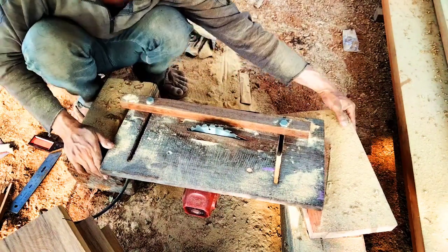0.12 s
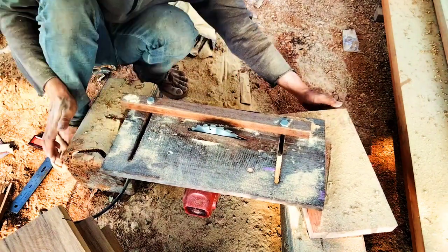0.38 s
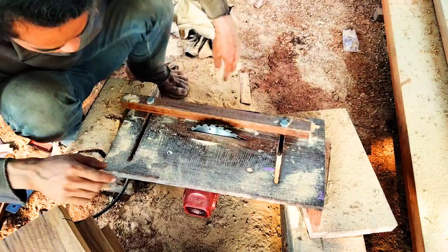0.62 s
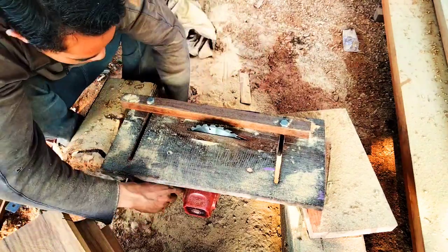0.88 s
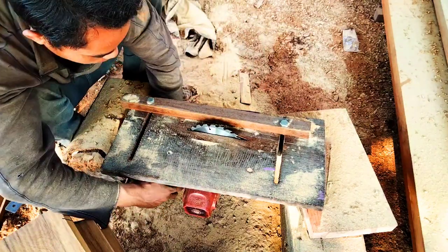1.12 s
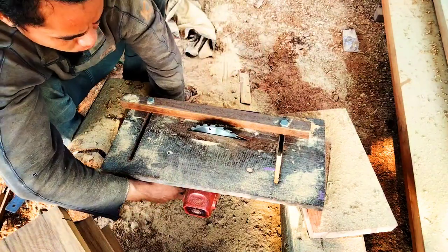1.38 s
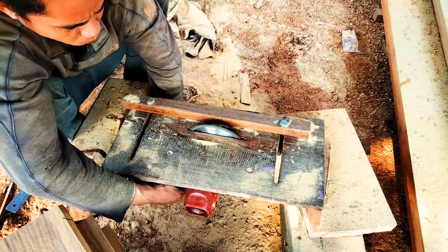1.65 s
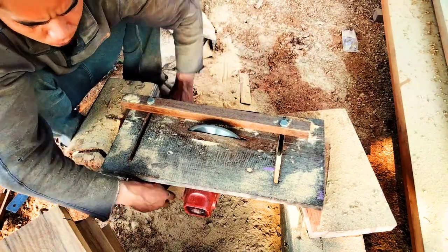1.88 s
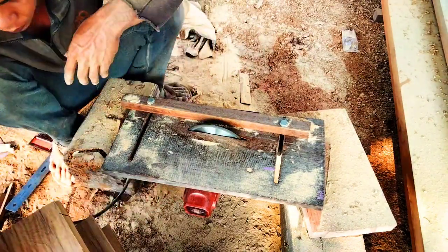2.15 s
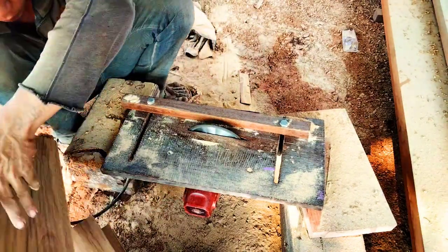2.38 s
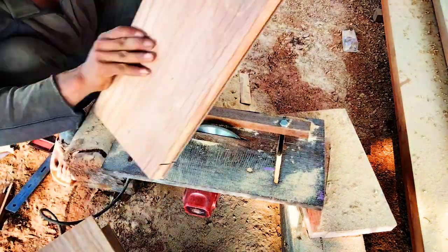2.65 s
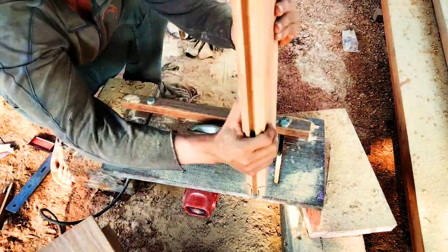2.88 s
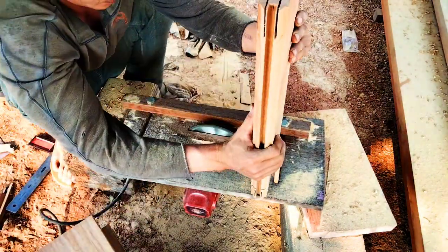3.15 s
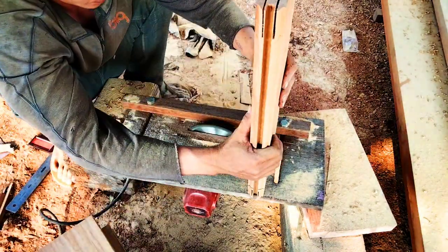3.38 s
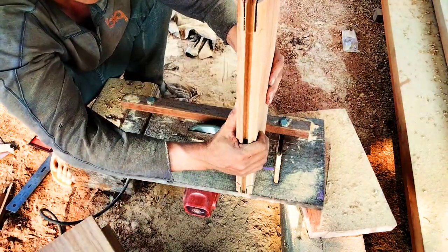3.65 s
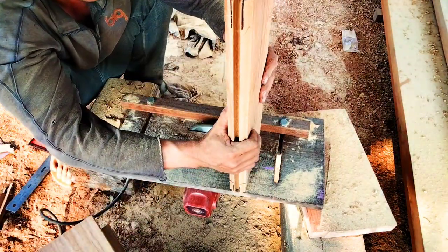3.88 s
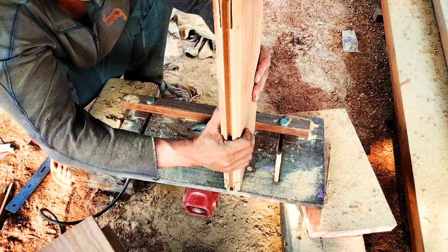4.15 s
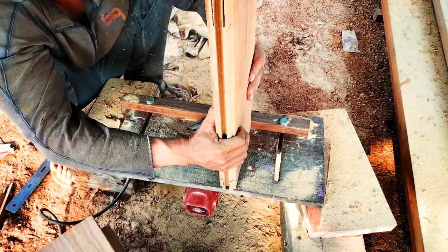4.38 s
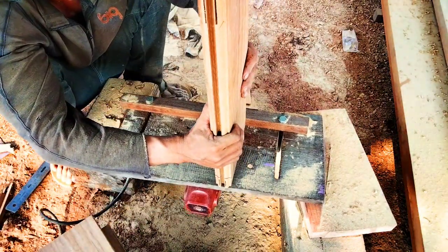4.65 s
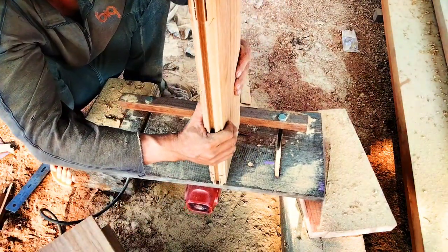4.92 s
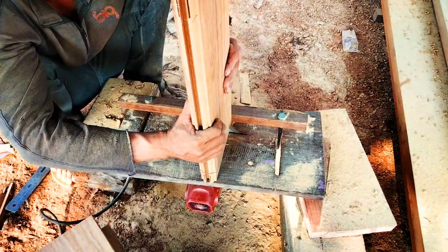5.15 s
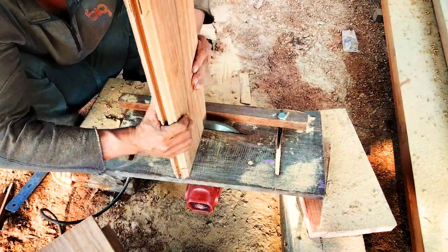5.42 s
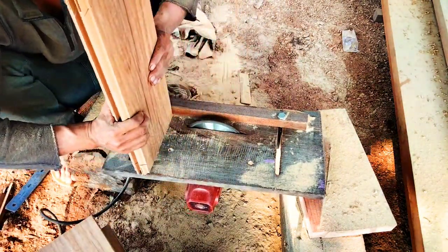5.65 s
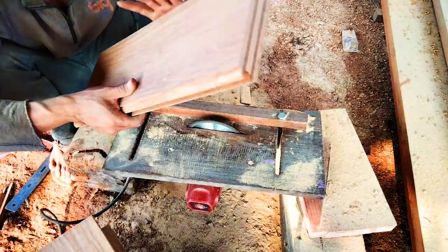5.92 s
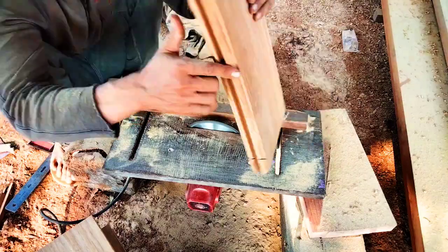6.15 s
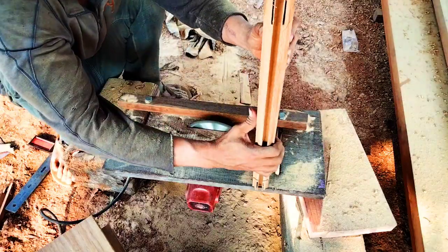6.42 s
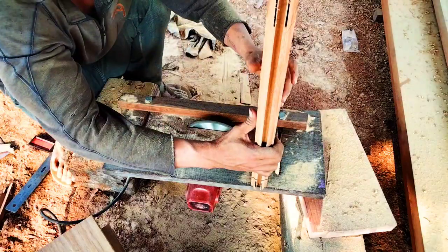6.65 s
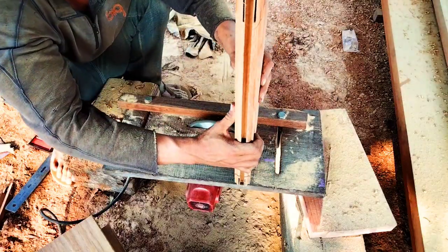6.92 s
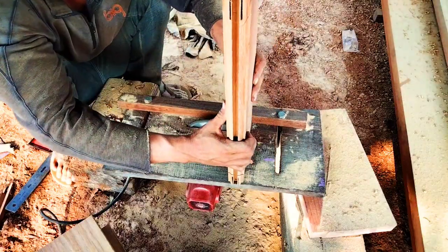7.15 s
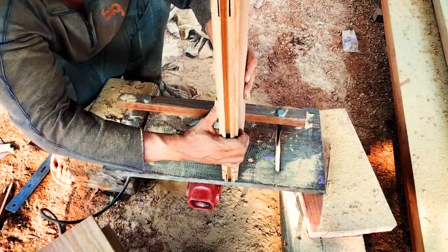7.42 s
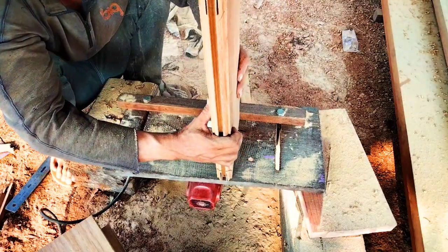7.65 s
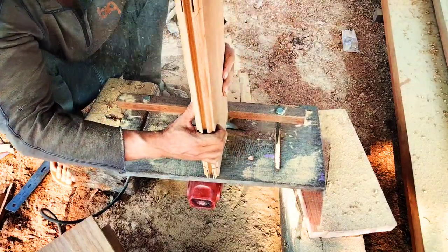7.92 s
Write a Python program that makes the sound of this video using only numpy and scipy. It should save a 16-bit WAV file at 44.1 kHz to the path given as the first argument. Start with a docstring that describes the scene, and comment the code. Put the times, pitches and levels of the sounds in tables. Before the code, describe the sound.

For the first 1.6 seconds a yard is very quiet: low lumpy rumble, faint plank-like ticks, small rustles, a tiny squeak and very high falling chirps. At 1.6 a switch jerks slack gears into a short hard rattle, and a small motor whines upward within about half a second, settling near 1.8 kHz over a bright, throbbing fan rush. It runs free until about 4.1, when a board meets the blade: ringing tooth strikes, loud tearing hiss and clicking chips, the whine sagging markedly. Dust gusts thump and crackle on the close microphone near 4.3, 4.5 and 4.9. The cut ends around 5.4 to 5.65 with sharp snags, heavy thumps and a brief extra touch. The whine recovers and runs free until 7.1, then a second cut tears in, pitch sagging again, a thump at 7.7, still cutting at the end around 8 seconds. Close, dry mono.

```python
"""A quiet yard first: low rumble, ticks ringing like planks, noise rustles, falling chirps. Then a small
geared saw under a plank table, heard from close above in mono: the switch jerks slack gears into a burst of
noise, and the motor whines up to speed as sines locked to its rotation, with a throbbing fan rush. A board is
fed over the blade twice, with a brief touch between: teeth strike resonances, fibres hiss, the speed sags,
and gusts of sawdust thump the microphone as pressure pulses with noise cracks."""
import sys
import numpy as np
from scipy import signal
from scipy.fft import rfft, irfft, next_fast_len
from scipy.io import wavfile
from scipy.ndimage import uniform_filter1d, map_coordinates

SR = 44100
rng = np.random.default_rng(int(sys.argv[2]) if len(sys.argv) > 2 else 0)


def log_audio(samples):
    """Write samples as a 16-bit WAV file to the path given in sys.argv[1]."""
    # one column per channel
    frames = np.atleast_2d(samples).T
    # limit to full scale, then quantise
    limited = np.clip(frames, -1, 1)
    pcm = np.round(limited * 32767).astype(np.int16)
    wavfile.write(sys.argv[1], SR, pcm)


def gain_from_db(level_db):
    """Convert decibel levels to linear amplitude factors (20 dB per decade)."""
    decades = np.asarray(level_db, float) / 20
    return 10 ** decades


N = 354563
T = np.arange(N) / SR
GEAR, TEETH = 7 / 38, 24  # blade turns per armature turn; teeth on the blade


def unit(x):
    """Scale to rms 1."""
    return x / np.sqrt(np.mean(x ** 2) + 1e-20)


def curves(rows, outside=None):
    """One value per sample for each column after the time."""
    s, *cols = np.transpose(rows)
    return [np.interp(T, s, c, outside, outside) for c in cols]


def wobble(rate_hz):
    """Smooth random curve, rate_hz knots a second."""
    return map_coordinates(rng.standard_normal(int(N * rate_hz / SR) + 4), [T * rate_hz])


def bump(centre_s, half_s):
    """Gaussian swell, down to 1/e at half_s from its centre."""
    return np.exp(-((T - centre_s) / half_s) ** 2)


def smoothed(x, rows, columns):
    """Running mean over both axes."""
    return uniform_filter1d(uniform_filter1d(x, rows, 0), columns, 1)


def filtered(x, response):
    """x times a complex response of frequency."""
    m = next_fast_len(N + 8192)
    return irfft(rfft(x, m) * response(np.fft.rfftfreq(m, 1 / SR)), m)[:N]


def ringing(x, modes, flip=-1):
    """x through a set of resonances; flip=1 keeps neighbours in step, which digs notches between them."""
    def response(f):
        total = 0
        for k, (hz, width, db) in enumerate(modes):
            total = total + flip ** k * gain_from_db(db) * 1j * f * width / (hz * hz - f * f + 1j * f * width)
        return total
    return filtered(x, response)


def noise(spectrum, patchy_db):
    """Coloured noise of rms 1 with time-frequency patches of random gain."""
    z = signal.stft(rng.standard_normal(N), nperseg=1024)[2]
    field = smoothed(rng.standard_normal(z.shape), 3, 7)
    x = signal.istft(z * gain_from_db(patchy_db * unit(field)), nperseg=1024)[1][:N]
    hz, db = np.transpose(spectrum)
    return unit(filtered(x, lambda f: gain_from_db(np.interp(np.log(f + 1), np.log(hz), db))))


# ticks: (time [s], level [dB], t60 [s], extra level of the lowest mode [dB])
TICKS = [(.072, -61, .04, -4), (0.084, -57, 0.037, -8), (0.129, -48, 0.014, 4), (0.368, -64, 0.02, -5),
         (0.533, -66, 0.03, 7), (1.275, -67, .03, -9), (1.546, -52.5, 0.025, -20)]
# plank modes: (frequency [Hz], level [dB])
PLANK = [(800, 2), (1430, 1), (2050, -8), (2450, -8)]


def ticks():
    """Decaying plank modes under a shorter noise burst."""
    out, t = np.zeros(N + SR), np.arange(SR // 10) / SR
    for s, db, t60, lowest_db in TICKS:
        knock = 0.89 * gain_from_db(-60 * t / 0.025) * rng.standard_normal(len(t))
        for hz, level in PLANK:
            mode_db = level + lowest_db * (hz < 1000) + rng.normal(0, 2)
            knock += gain_from_db(mode_db) * np.sin(2 * np.pi * hz * t)
        out[round(s * SR):][:len(t)] += gain_from_db(db - 60 * t / t60) * knock
    return out[:N]


# rustles: (time [s], level [dB], length [s])
RUSTLES = [(0.077, -70, 0.055), (0.13, -71, 0.045), (.37, -76, 0.027), (.46, -66.5, 0.037),
           (0.777, -68, .03)]


def rustles():
    """Short swells of white noise."""
    swell = sum(gain_from_db(db) * bump(s, length / 2) for s, db, length in RUSTLES)
    return swell * rng.standard_normal(N)


# squeaks: (time [s], level [dB], frequency [Hz], half length [s])
SQUEAKS = [(.4, -74, 2700, .012), (1.01, -72, 2770, .028)]
# far chirps: (time [s], peak [dB], starting frequency [Hz])
CHIRPS = [(1.005, -72, 12400), (1.32, -69, 12600)]


def chirps():
    """Steady squeaks with unsteady level, and chirps of falling pitch with phase jitter."""
    fall_hz_per_s = 66000
    out, t = np.zeros(N + SR), np.arange(SR // 10) / SR
    for s, db, hz, half_s in SQUEAKS:
        out[:N] += gain_from_db(db + 3.3 * wobble(59.2)) * bump(s, half_s) * np.sin(2 * np.pi * hz * T)
    for s, db, hz in CHIRPS:
        jitter = 0.046 * np.cumsum(rng.standard_normal(len(t)))
        cycles = hz * t - fall_hz_per_s * t ** 2 / 2 + jitter
        envelope = np.exp(-((t - .012) / 0.009) ** 2)
        out[round(s * SR):][:len(t)] += gain_from_db(db) * envelope * np.sin(2 * np.pi * cycles)
    return out[:N]


# yard rumble: (frequency [Hz], density [dB per Hz])
YARD = [(12, -32), (25, -29), (109, -8), (259, -8), (289, -8), (371, -9), (666, -21.5), (2460, -32),
        (2830, -30.5), (4800, -39), (11700, -44), (15400, -46)]


def yard():
    """Low lumpy noise rumble, with small ticks, rustles and chirps."""
    rumble_db = -63
    rumble = gain_from_db(rumble_db + 1.6 * wobble(20.4)) * noise(YARD, patchy_db=-1.5)
    return rumble + ticks() + rustles() + chirps()


SWITCH_S, CATCH_S = 1.607, 1.66  # switch closes; gears have taken up their slack
FREE_HZ = 1826  # armature turns a second without load
# armature load: (time [s], pull on the steady speed [Hz])
DRAG = [(1.66, 17), (3, 1), (4.13, 0), (4.3, 153), (4.55, 315), (4.95, 434), (5.1, 427), (5.28, 376),
        (5.42, 153), (5.56, 25), (6.2, 6), (7.09, 10), (7.25, 124), (7.47, 407), (7.6, 420), (7.8, 456),
        (8.04, 455)]


def armature():
    """Turns per second: the rotor climbs to its free speed and follows the load, both with one lag."""
    below_free_hz, lag_s = 663, .16  # shortfall at the catch; inertia
    step = 1 / (lag_s * SR)
    drag = curves(DRAG)[0]
    sag = signal.lfilter([step], [1, step - 1], drag - drag[0]) + drag[0]
    return FREE_HZ - sag - below_free_hz * np.exp(-np.maximum(T - CATCH_S, 0) / lag_s)


def turns():
    """Armature revolutions so far, with a slight hunting of the speed."""
    return np.cumsum(armature() * (1 + 0.0004 * wobble(25))) / SR


def turning(rev, multiple):
    """Sine at a multiple of the armature rotation."""
    return np.sin(2 * np.pi * multiple * rev)


# casing modes: (frequency [Hz], width [Hz], level [dB])
CASING = [(773, 67, -1), (1160, 32, 10), (2010, 280, -4), (3700, 210, -8), (5160, 380, -5.5)]


def jerk():
    """Slack gears rattle the casing: sharp attack, hold until the catch, fast then slow release."""
    level_db, attack_s, t60_s, tail_db, tail_t60_s = -24.5, 0.0042, 0.0068, -19, .25
    after = np.maximum(T - CATCH_S, 0)
    attack = np.clip((T - SWITCH_S) / attack_s, 0, 1)
    release = np.maximum(gain_from_db(-60 * after / t60_s), gain_from_db(tail_db - 60 * after / tail_t60_s))
    rattle = rng.standard_normal(N) * (rng.random(N) < .15)
    return gain_from_db(level_db) * attack * release * (unit(ringing(rattle, CASING)) + 0.38 * unit(rattle))


# fan, brush and gear rush: (frequency [Hz], density [dB per Hz])
AIR = [(15, -62), (25, -27), (321, -23), (388, -26), (1450, -10.5), (1610, -11), (1800, -10.5), (1950, -10),
       (2110, -7.5), (2350, -12.5), (3420, -15.5), (3920, -8), (7470, -12.5), (8310, -10.5), (15400, -11.5)]


def rush(rev, speed):
    """Fan, brush and gear noise, throbbing once a blade turn and growing with the run-up."""
    level_db, speed_power, start_db = -25.98, 0.61, -4.5
    attack_s, settle_s = 0.0058, 1.3
    on = np.maximum(T - SWITCH_S, 0)
    spun_up = np.where(T < PASSES[0][0][0], speed / FREE_HZ, 1)  # run-up only, not the sag
    rush_db = level_db + speed_power * 10 * np.log10(spun_up) + start_db * np.exp(-on / settle_s)
    rush_db += 20 * np.log10(np.clip(on / attack_s, 1e-6, 1))
    throb = 1 + .15 * turning(rev, GEAR)
    return gain_from_db(rush_db + 0.78 * wobble(8)) * throb * noise(AIR, patchy_db=1.5)


# housing response to the whine, dead near one speed: (frequency [Hz], gain [dB])
HOUSING = [(1170, -13), (1250, 0), (1350, -2.5), (1420, 1.5), (1495, -2.5), (1540, -6), (1580, -16),
           (1622, -13), (1648, -1), (1685, -2), (1760, -5.5), (1825, -4)]
# free-running tones: (multiple of armature, multiple of blade shaft, rms level at full speed [dB])
ORDERS_FREE = [(0, 1, -65), (0, 1.29, -66), (0, 2, -64), (1, -1, -55), (1, 1, -50), (2, 0, -52),
               (3, 0, -53), (0, 24, -45.5)]
# overtones passing a housing resonance: (multiple of armature, centre [Hz], half width [Hz], rms level [dB])
PASSING = [(1 + GEAR, 1820, 110, -44), (2, 2500, 70, -38), (5, 7900, 550, -42)]


def whine(rev, speed):
    """The unbalanced armature whines through the housing; gears, shaft and teeth add weaker tones."""
    whine_db = -29 + np.interp(speed, *np.transpose(HOUSING))
    tones = gain_from_db(whine_db + 1.1 * wobble(14)) * turning(rev, 1)
    swing = (speed / speed.max()) ** 14  # higher tones fade quickly when the speed drops
    for rotor, shaft, db in ORDERS_FREE:
        fade = swing if rotor or shaft > 2 else 1
        unsteady_db = 4 if shaft < TEETH else 1
        tones = tones + fade * gain_from_db(db + unsteady_db * wobble(15)) * turning(rev, rotor + shaft * GEAR)
    for multiple, hz, width, db in PASSING:
        resonance = np.exp(-((multiple * speed - hz) / width) ** 2)
        tones = tones + gain_from_db(db) * resonance * turning(rev, multiple)
    return np.sqrt(2) * tones


# moving air and sawdust at the microphone: (frequency [Hz], density [dB per Hz])
DUST = [(12, -24), (20, -10), (144, -11.5), (264, -10.5), (341, -14), (900, -14.5), (1170, -15.5),
        (1980, -120)]


def draught(speed):
    """Fan air reaches the microphone as low patchy noise, steeply dependent on speed."""
    low = noise(DUST[:4] + [(400, -37)], patchy_db=9.5)
    return np.sqrt(2) * (speed / speed.max()) ** 8 * gain_from_db(-60.0 + 3.3 * wobble(13)) * low


def motor(rev):
    """Jerk and rush from the switch on; whine and draught once the gears catch."""
    speed = armature()
    return (T > CATCH_S) * (whine(rev, speed) + draught(speed)) + rush(rev, speed) + jerk()


# dust gusts: (time [s], push [dB], length [s], flutter share, crack [dB])
GUSTS = [(2.815, -46, 0.015, 0.8, -62), (4.267, -20, 0.0062, 0.084, -12.5),
         (4.329, -19.5, 0.011, 0.43, -16), (4.538, -38, 0.009, 0.21, -21), (4.839, -43, 0.014, 0.74, -24),
         (4.911, -32, 0.0085, 0.43, -26), (5.389, -32, 0.0022, 0.58, -14), (5.552, -12, 0.0032, 1.2, -14.5),
         (5.57, -20, 0.0082, 0.72, -7.5), (5.648, -18.5, 0.0038, 2.8, -7.5),
         (7.187, -41, 0.0056, 0.42, -19.5), (7.24, -35, 0.0084, 0.65, -37),
         (7.706, -17.5, 0.0048, 0.56, -20.5)]


def gusts():
    """A puff pushes the diaphragm, which swings back slowly; grit cracks on the grille."""
    out, t = np.zeros(N + SR), np.arange(SR // 4) / SR
    for s, db, length, rough, crack_db in GUSTS:
        u = t / length
        push = 3.13 * u * np.exp(-u) - 0.1 * u * np.exp(-u / 6.5)
        slow = uniform_filter1d(uniform_filter1d(rng.standard_normal(len(t)), 30), 30)
        flutter = 1 + rough * unit(slow) * np.exp(-u / 4)
        crack = gain_from_db(crack_db - 60 * t / 0.093) * uniform_filter1d(rng.standard_normal(len(t)), 5)
        out[round(s * SR):][:len(t)] += gain_from_db(db) * push * flutter + crack
    return out[:N]


# blade modes: (frequency [Hz], width [Hz], level [dB])
BLADE = [(5115, 130, 5.5), (5670, 43, 2), (5940, 42, -3), (7130, 86, -2.5), (7850, 42, -12),
         (8600, 96, -2.5), (9255, 49, 0.5), (9430, 39, 0), (9760, 91, -3), (10570, 410, -6),
         (11600, 130, -12), (12330, 80, -6), (12350, 190, -5.5), (14100, 140, -5)]
# modes of the board under the teeth: (frequency [Hz], width [Hz], level [dB])
BOARD = [(2500, 1200, -20), (6700, 1700, -10), (6802, 490, 3), (8240, 570, -6.5), (10830, 570, 8),
         (12600, 620, -1), (14550, 290, 0)]


def tooth_strikes(rev):
    """Each tooth strikes once, at its sub-sample moment, ringing board and blade; rms 1."""
    tooth_spread_db, soft_hz = 2.5, 15500  # bite differs per tooth; wood cushions the blow above soft_hz
    passed = rev * GEAR * TEETH
    tooth = np.arange(1, int(passed[-1]))
    at = np.interp(tooth, passed, np.arange(N))
    angle = 2 * np.pi * tooth / TEETH
    runout = 1 + 1.0 * np.cos(angle) + 0.37 * np.cos(2 * angle + 3.2)  # blade sits off centre
    own = gain_from_db(tooth_spread_db * rng.standard_normal(TEETH))[tooth % TEETH]
    bevel = 1 + .09 * (-1.) ** tooth  # alternates left and right
    size = own * runout * bevel * gain_from_db(1.6 * rng.standard_normal(len(tooth)))
    taps = np.floor(at)[:, None] + np.arange(-7, 9)
    lag = taps - at[:, None]
    kernel = np.sinc(lag) * np.cos(np.pi * lag / 16) ** 2
    where = np.clip(taps, 0, N - 1).astype(int)
    blows = np.bincount(where.ravel(), (kernel * size[:, None]).ravel(), N)
    blows = filtered(blows, lambda hz: 1 / (1 + (hz / soft_hz) ** 8))
    return unit(ringing(blows, BOARD, flip=1.0) + 0.34 * ringing(blows, BLADE))


# torn fibres: (frequency [Hz], density [dB per Hz])
WOOD = [(300, -46), (500, -18), (1100, -3.5), (2300, -5), (3140, -7.5), (3900, -7.5), (4800, -16),
        (6000, -7), (6900, -0.5), (7600, -4.5), (9000, -6), (10200, -3), (12800, 0), (15400, -7)]
# table-top modes under the cut: (frequency [Hz], width [Hz], level [dB])
TABLE = [(1120, 21, -4.5), (2420, 28, 7), (2690, 20, 2)]


def fibre_hiss(rev):
    """Torn fibres hiss through blade and table modes, swelling once a blade turn; rms 1."""
    sweep = 1 + .5 * np.cos(2 * np.pi * GEAR * rev)
    fibres = sweep * noise(WOOD, patchy_db=3.5)
    blade, table = unit(ringing(fibres, BLADE)), unit(ringing(fibres, TABLE))
    return unit(0.84 * fibres + 1.1 * blade + 0.18 * table)


# tones under load: (multiple of armature, multiple of blade shaft, amplitude re tearing [dB])
SIDEBANDS = [(1, 1, -27), (1, 3, -24), (1, 5, -26), (0, 7, -27), (0, 9, -23)]


def gear_mesh(rev):
    """The loaded pinion sings, 7 teeth a turn, among tones of armature and shaft."""
    mesh = gain_from_db(-23 + 4.3 * wobble(31)) * turning(rev, 7)
    for rotor, shaft, db in SIDEBANDS:
        mesh = mesh + gain_from_db(db + 3.7 * wobble(9)) * turning(rev, rotor + shaft * GEAR)
    return mesh


def chips():
    """Chips snap off at random and click: band-limited impulses of random size."""
    chips_per_s, drive_db = 120, 8
    thrown = (rng.random(N) < chips_per_s / SR) * rng.exponential(size=N)
    return -gain_from_db(drive_db) * filtered(thrown, lambda hz: 1j * hz / (500 + 1j * hz) / (1 + 1j * hz / 4000) ** 2)


# thicker sprays of dust: (time [s], level [dB])
SPRAYS = [(4.171, -50), (4.32, -47), (4.88, -41), (5.17, -43), (5.36, -38), (5.56, -37), (5.635, -29.5),
          (7.21, -48), (7.43, -47), (7.72, -47), (7.96, -39)]


def sawdust(tear):
    """Dust rumbles on the microphone, steadily under the tearing and thicker in sprays."""
    under_db, spray_half_s = -25, 0.033
    level = gain_from_db(under_db) * tear + sum(gain_from_db(db) * bump(s, spray_half_s) for s, db in SPRAYS)
    return level * gain_from_db(2.5 * wobble(35)) * noise(DUST, patchy_db=2.0)


# board on blade, one list a contact: (time [s], tearing [dB before trim], tooth strikes [dB before trim])
PASSES = [
    [(4.13, -53, -34), (4.2, -26.5, -15), (4.3, -18, -14.5), (4.39, -17.5, -18), (4.47, -17.5, -24.5),
     (4.54, -17.5, -19.5), (4.6, -15.5, -20.5), (4.72, -19, -18.5), (4.76, -16.5, -28), (4.82, -17.5, -20),
     (4.98, -20, -21), (5.08, -19.5, -22.5), (5.2, -15.5, -21), (5.39, -18, -35), (5.41, -27, -27.5),
     (5.47, -21, -28), (5.545, -27, -31), (5.562, -47, -60)],
    [(5.6, -35, -45), (5.61, -19.5, -32), (5.645, -16.5, -34), (5.662, -44, -42)],
    [(7.09, -49, -48), (7.118, -27, -17), (7.15, -26, -12), (7.2, -21, -18), (7.26, -22, -11.5),
     (7.37, -19, -20.5), (7.44, -15.5, -16.5), (7.52, -21, -18), (7.6, -17, -23.5), (7.69, -17, -20),
     (7.85, -17.5, -22.5), (7.93, -14, -29), (8.04, -15.5, -35)],
]
# a tooth rips the edge: (time [s], peak [dB before trim], rise [s])
SNAGS = [(5.399, -16, 0.026), (5.549, -17, 0.0077), (5.649, -10, 0.0062)]


def cut(rev):
    """Board contact drives tooth strikes and tearing; snags flare up, dust follows the tearing."""
    trim_db, snag_fall_s = -4.0, 0.0025
    contacts = zip(*[curves(p, -120) for p in PASSES])
    tear, strike = [gain_from_db(np.max(c, 0)) for c in contacts]
    dust = sawdust(tear)
    for s, db, rise in SNAGS:
        tear = tear + gain_from_db(db) * np.exp(-np.where(T < s, (s - T) / rise, (T - s) / snag_fall_s))
    torn = tear * (fibre_hiss(rev) + gear_mesh(rev) + chips())
    struck = strike * gain_from_db(1.5 * wobble(45) + 1.9 * wobble(14)) * tooth_strikes(rev)
    grain = gain_from_db(0.97 * wobble(30))
    return gain_from_db(trim_db) * grain * (torn + struck) + dust


def scene():
    """The same sound on both channels."""
    rev = turns()
    return np.tile(yard() + motor(rev) + gusts() + cut(rev), (2, 1))


# depth below the neighbours at which a narrow band is turned down: (frequency [Hz], level [dB])
GATE = [(300, -13.5), (2000, -8), (4500, -3.5), (9000, -11), (15000, -14)]
# deepening of lasting dips: (frequency [Hz], exponent)
SHARPEN = [(1000, .05), (3000, .45), (5000, 1.05), (9300, 1.05), (11000, .4)]


def thinned(x):
    """Spectral thinning: narrow bands well under their neighbours are turned down; lasting dips deepen."""
    hz, _, z = signal.stft(x, SR, nperseg=1024)
    power = smoothed(np.abs(z) ** 2, 3, 5) + 1e-20
    # origin=4: the neighbours are mostly those below
    share = np.sqrt(power / uniform_filter1d(power, size=18, axis=0, origin=4))
    gate = gain_from_db(np.interp(hz, *np.transpose(GATE)))[:, None]
    x = signal.istft(z / (1 + (gate / share) ** 8), nperseg=1024)[1][:N]
    hz, _, z = signal.stft(x, SR, nperseg=2048, noverlap=1536)
    lasting = np.abs(smoothed(np.abs(z) ** 2, 3, 9)) + 1e-20
    contrast = np.minimum(lasting / uniform_filter1d(lasting, size=25, axis=0), 1.3)
    sharp = z * contrast ** np.interp(hz, *np.transpose(SHARPEN))[:, None]
    return signal.istft(sharp, nperseg=2048, noverlap=1536)[1][:N]


def roll_off(x):
    """The treble ends steeply here."""
    return signal.sosfilt(signal.butter(12, 15580, fs=SR, output="sos"), x)


def record(dry):
    """A pushed diaphragm loses sensitivity: strong low pressure squeezes all above it; peaks round off."""
    low_hz, strain_limit, peak_limit = 250, 0.094, .88
    low = filtered(dry[0], lambda hz: 1 / (1 + (hz / low_hz) ** 4))
    strain = signal.lfilter([.0015], [1, .0015 - 1], np.abs(low))
    heard = low + (dry[0] - low) / (1 + (strain / strain_limit) ** 2)
    heard = thinned(heard)
    heard = heard / (1 + np.abs(heard / peak_limit) ** 6) ** (1 / 6)
    return roll_off(np.tile(heard, (2, 1)))


dry = scene()
out = record(dry)
log_audio(out)
```